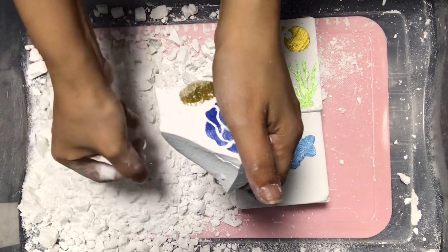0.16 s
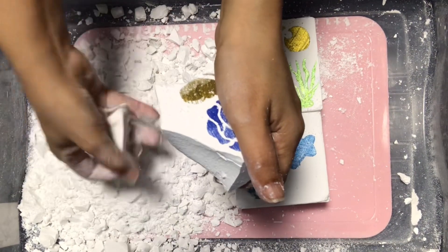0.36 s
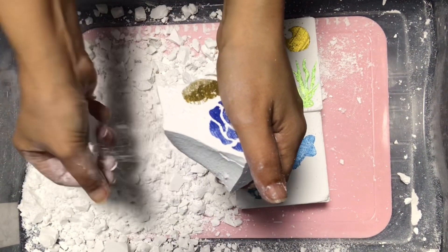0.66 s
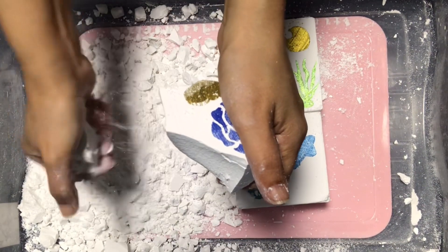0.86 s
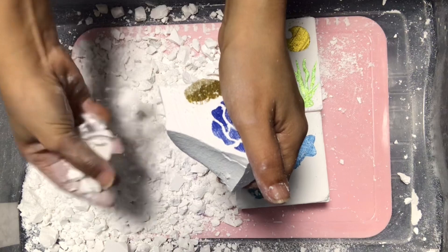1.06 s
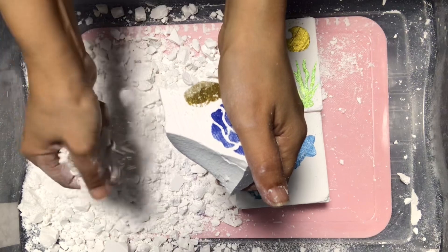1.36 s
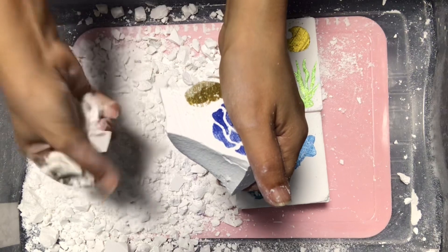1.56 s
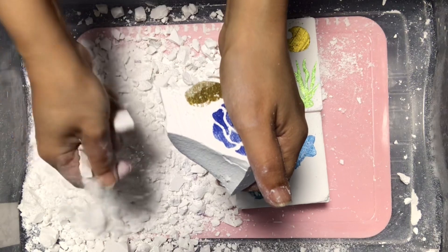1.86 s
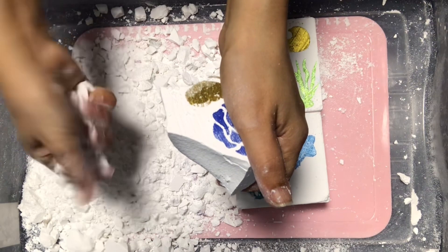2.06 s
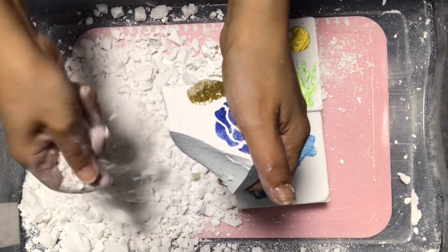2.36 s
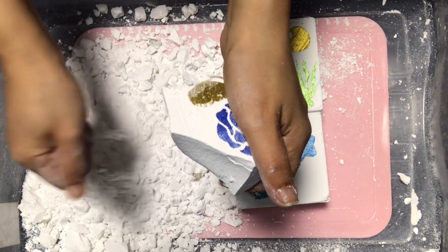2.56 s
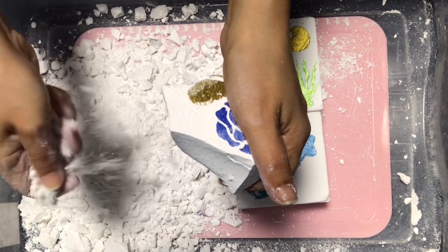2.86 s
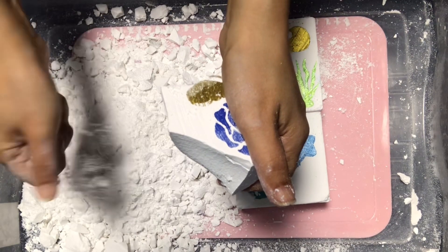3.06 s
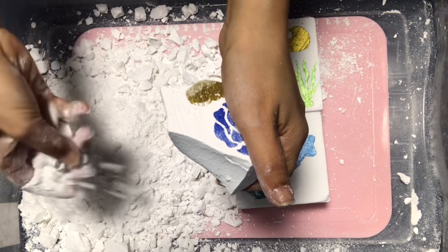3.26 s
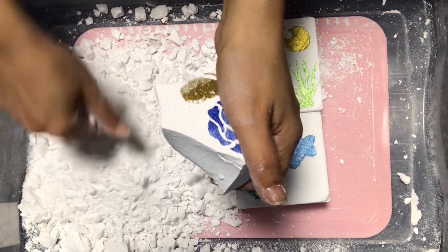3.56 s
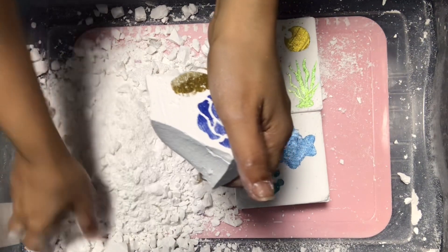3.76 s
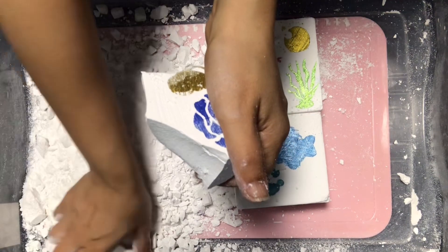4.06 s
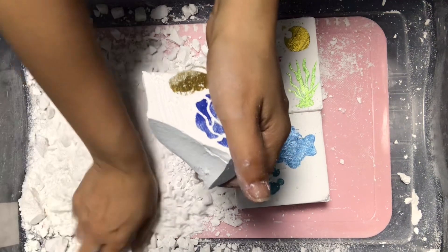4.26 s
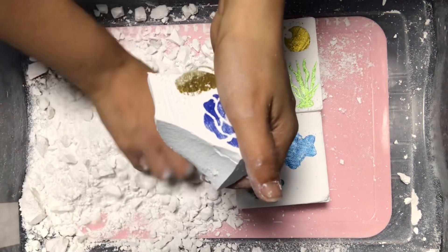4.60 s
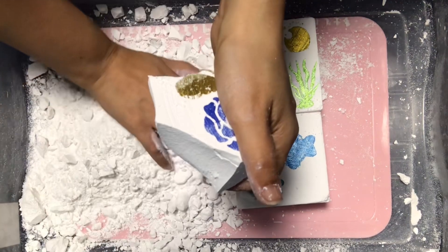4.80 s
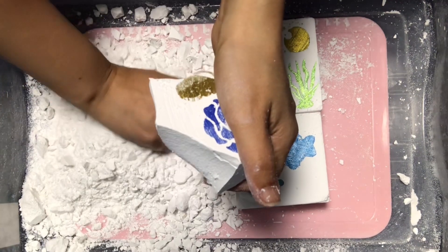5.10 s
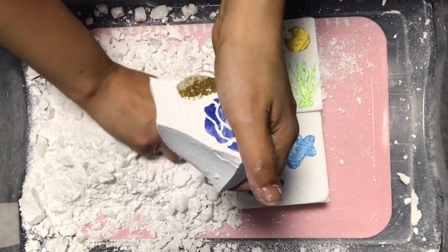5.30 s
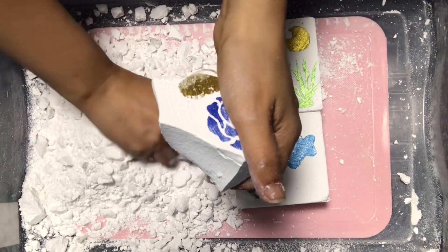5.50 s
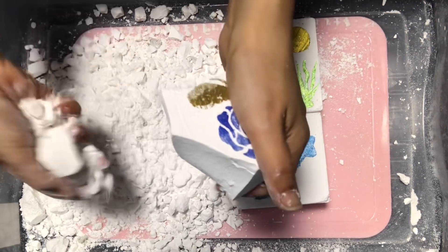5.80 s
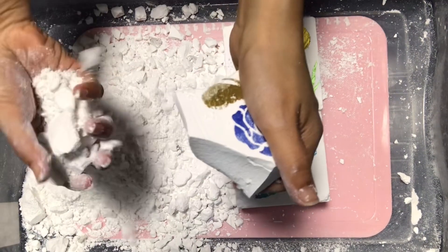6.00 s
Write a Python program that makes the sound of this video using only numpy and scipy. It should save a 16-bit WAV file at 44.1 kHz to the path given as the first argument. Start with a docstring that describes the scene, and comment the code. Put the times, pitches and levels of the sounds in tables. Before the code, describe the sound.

Brittle chalk lumps snap in bursts, the loudest slightly overloading a close microphone, while falling pieces tap the plastic tray. Later the hand drops into the crumbs: low table jolts, boomy tray thuds and coarse, muffled scraping. Finally it lifts out, nearly quiet, with a few light crunches. Dry small-room echoes and a faint steady room murmur lie beneath.

```python
"""At a table in a room, close to a plastic tray, a hand crushes dry chalk and then digs through the crumbs.
Lumps crack as noise bursts that ring fragments and shed grit; splinters keep one clear tone.
Falling pieces excite the tray modes, and the palm jolts the table at low pitch.
Powder hisses and crumbs scrape as random grains, swelling with each move of the hand.
Short echoes and the room's steady noise lie below; the loudest cracks overload the input."""
import sys
import numpy as np
from scipy import signal
from scipy.fft import rfft, irfft
from scipy.io import wavfile

SR = 44100
rng = np.random.default_rng(int(sys.argv[2]) if len(sys.argv) > 2 else 0)


def boost(x):
    """Linear amplitude factor 10**(x/20) for a level x in decibels (scalar or array-like)."""
    u = np.asarray(x, float) / 20
    return 10 ** u


def to_wav(s):
    """Save 16-bit WAV."""
    ch = np.atleast_2d(s).T  # columns
    pcm = np.round(np.clip(ch, -1, 1) * 32767)  # PCM
    wavfile.write(sys.argv[1], SR, pcm.astype(np.int16))


N = 270774   # length in samples

DIGGING_S = (3.75, 5.6)   # from, to: the hand is down in the heap


def rms_one(x):
    """Normalization: scale to unit power."""
    return x / np.sqrt(np.mean(x ** 2) + 1e-20)


def peak_one(x):
    """Normalization: scale to unit height."""
    return x / (np.max(np.abs(x)) + 1e-12)


def add(out, start_s, sound):
    """Superposition: lay a short sound into the track at its start."""
    i = round(start_s * SR)
    out[i:i + len(sound)] += sound[:N - i]


def fade(t60_s, size):
    """Exponential damping: a fall of 60 dB in t60_s."""
    return boost(-60 * np.arange(size) / (SR * max(t60_s, .001)))


def resonate(x, hz, width_hz):
    """Damped oscillator: a two-pole resonance with gain 1 on top."""
    r = np.exp(-np.pi * width_hz / SR)
    feedback = [1, -2 * r * np.cos(2 * np.pi * hz / SR), r * r]
    return signal.lfilter([(1 - r * r) / 2, 0, (r * r - 1) / 2], feedback, x)


def band(x, low_hz, high_hz):
    """Band limitation: a Butterworth band-pass."""
    edges = [low_hz, min(high_hz, .45 * SR)]
    return signal.sosfilt(signal.butter(2, edges, "band", fs=SR, output="sos"), x)


def body(x, modes):
    """Modal superposition: resonances in parallel, signs alternating."""
    return sum((-1) ** k * boost(db) * resonate(x, hz, width_hz)
               for k, (hz, width_hz, db) in enumerate(modes))


def colour(x, spectrum):
    """Spectral shaping: filter a steady sound to levels given on log frequency, at unit power."""
    hz, db = np.transpose(spectrum)
    grid = np.fft.rfftfreq(len(x), 1 / SR) + 1
    gain = boost(np.interp(np.log(grid), np.log(hz), db))
    return rms_one(irfft(rfft(x) * gain, len(x)))


def drift(rate_hz):
    """Low-passed noise: slow random motion of unit power."""
    r = np.exp(-2 * np.pi * rate_hz / SR)
    slow = signal.lfilter([1], [1, -2 * r, r * r], rng.standard_normal(N + SR))
    return rms_one(slow[SR:])


def grains(per_s, spread_db, clump_db, clump_rate_hz, smooth):
    """Random impulse process: uneven tiny contacts in clumps, over a smooth share of finest dust."""
    sizes = boost(spread_db * np.minimum(rng.exponential(1, N), 5)) * rng.standard_normal(N)
    clicks = sizes * (rng.random(N) < per_s / SR)
    dust = rng.standard_normal(N)
    return (rms_one(clicks) + smooth * dust) * boost(clump_db * drift(clump_rate_hz))


def crumbs(per_s, low_hz, high_hz, cycles):
    """Impulse excitation: crumbs split at random, each size ringing a few cycles at its own pitch."""
    clicks = grains(per_s, spread_db=4.5, clump_db=4.0, clump_rate_hz=25.0, smooth=0)
    dealt = rng.integers(0, 12, N)   # which of the 12 sizes splits
    pitches = np.geomspace(low_hz, high_hz, 12)
    return rms_one(sum(resonate(clicks * (dealt == k) + 1e-18, hz, hz / cycles)
                       for k, hz in enumerate(pitches)))


# steady noise of the room: pitch_hz, level_db (relative, per Hz)
ROOM = [(20, -40.5), (35, -13), (80, 4.5), (300, -4), (700, -4), (2000, -9.5), (5000, -14), (9000, -15),
        (13300, -22.5), (16000, -13.5)]


def room():
    """Stationary noise: a low murmur and hiss with a fixed spectrum."""
    return boost(-42.5) * colour(rng.standard_normal(N), ROOM)


def near_echoes(x):
    """Early reflection: tray rim, table and walls return a short dull wash."""
    size = round(.15 * SR)
    delayed = np.arange(size) > .002 * SR
    wash = rng.standard_normal(size) * fade(0.12, size) * delayed
    wash = band(wash, 160, 15000)
    return signal.fftconvolve(x, wash / np.sqrt(np.sum(wash ** 2)))[:N]


# squeezes above the tray and pushes through the heap:
# start_s, length_s, powder_gain_db, tray_load_gain_db
MOVES = [(0.0, 0.066, -37.5, -45.5), (0.168, .12, -60, -45.5), (0.331, 0.036, -41, -45.5),
         (0.381, 0.023, -33.5, -47), (0.457, 0.22, -47, -51.5), (.7, 0.16, -39.5, -48),
         (.93, 0.093, -39.5, -52), (1.068, 0.13, -38, -45.5), (1.212, .22, -37, -48),
         (1.515, 0.14, -43, -48.5), (1.691, 0.056, -40.5, -44.5), (1.817, .16, -38, -43),
         (2.033, 0.14, -43, -42), (2.198, 0.14, -40.5, -43), (2.352, 0.15, -38.5, -39.5),
         (2.63, 0.098, -41.5, -49), (2.845, 0.21, -42, -45.5), (3.126, 0.044, -46, -41),
         (3.262, 0.2, -42, -45.5), (3.469, 0.067, -37.5, -36), (3.62, 0.039, -40, -38.5),
         (3.765, 0.076, -40.5, -34), (3.88, 0.092, -37.5, -34), (3.988, 0.084, -37, -30),
         (4.086, 0.11, -40.5, -37.5), (4.19, 0.11, -36.5, -36.5), (4.3, 0.084, -44, -36),
         (4.417, 0.068, -50, -42.5), (4.532, 0.14, -46, -38.5), (4.728, 0.065, -44.5, -38),
         (4.873, 0.12, -42, -32.5), (4.994, 0.057, -41.5, -31.5), (5.078, 0.062, -40.5, -32),
         (5.157, 0.075, -43.5, -34), (5.283, 0.099, -44, -30), (5.429, 0.059, -42, -34),
         (5.5, 0.091, -59, -48.5), (5.903, .15, -49.5, -46)]
ATTACK_S, RELEASE_S = 0.027, .02   # linear rise, time constant of the fall
REST_DB = -51.5     # gain of powder and crumbs settling between moves
DUG_IN_DB = -46.5   # steady load of the hand resting in the heap


def moves():
    """Addition of powers: each move swells in, holds and dies away in the powder and load gains."""
    time = np.arange(N) / SR
    power = boost(2 * REST_DB) * np.ones((2, N))
    for start_s, length_s, powder_db, load_db in MOVES:
        rise = np.clip((time - start_s) / ATTACK_S + .5, 0, 1)
        fall = np.exp(-np.maximum(time - start_s - length_s, 0) / RELEASE_S)
        gains = boost(np.array([[powder_db], [load_db]]))
        power += (gains * rise * fall) ** 2
    resting = (time > DIGGING_S[0]) & (time < DIGGING_S[1] - .1)
    power[1] += boost(2 * DUG_IN_DB) * resting
    return np.sqrt(power)


RUMBLE_DB, USUAL_LOAD_DB = -48, -45   # table level under a usual load, and that load
RUMBLE_FOLLOWS = 0.43                 # share of the load's swing in dB


def rumble(load):
    """Forced vibration: the table gives low noise that follows the weight on it."""
    table = rms_one(band(rng.standard_normal(N), 57, 156))
    return table * boost(RUMBLE_DB) * (load / boost(USUAL_LOAD_DB)) ** RUMBLE_FOLLOWS


# falling powder: pitch_hz, level_db (relative, per Hz)
POWDER = [(880, -47), (1500, -3), (1670, -11), (3250, 1.5), (3520, 1.5), (6310, -1), (9470, -3.5),
          (16000, -8.5)]


def powder():
    """Granular noise: dust and grains hiss down, with bright crumbs ringing among them."""
    hiss = grains(1500., spread_db=1.5, clump_db=2.0, clump_rate_hz=25.0, smooth=1.16)
    return colour(hiss, POWDER) + 0.52 * crumbs(350., 3160, 8540, cycles=14)


# heap and tray under dragged crumbs: pitch_hz, width_hz, level_db
HEAP = [(800, 300, -6), (1200, 300, -3), (1900, 210, 0), (2200, 250, -6), (2750, 350, -9),
        (4700, 1500, -19)]


def scraping():
    """Friction noise: crumbs scrape along; only the pressed heap lends its resonances."""
    rubbing = grains(800., spread_db=2.0, clump_db=1.0, clump_rate_hz=52.0, smooth=0.73)
    time = np.arange(N) / SR
    buried = (time > DIGGING_S[0]) & (time < DIGGING_S[1])
    in_heap = rms_one(body(rubbing, HEAP))
    in_air = rms_one(band(rubbing, 740, 2470))
    drag = np.where(buried, in_heap, in_air) + 0.58 * crumbs(250., 736, 2300, cycles=11.4)
    return drag * np.where(buried, boost(-3.5), boost(-5.5))


# tray floor: pitch_hz, width_hz, level_db
TRAY = [(230.5, 48, 0.5), (329, 96, 0), (450, 109, 0.5), (583, 243, -10)]


def tray_shaking():
    """Random modal excitation: many small contacts keep the tray floor ringing."""
    contacts = grains(900., spread_db=4.0, clump_db=1.5, clump_rate_hz=14.0, smooth=1.72)
    return rms_one(body(contacts, TRAY))


def hand():
    """Amplitude modulation: the moves govern powder, scraping, tray and table."""
    shed, load = moves()
    return shed * powder() + load * (scraping() + tray_shaking()) + rumble(load)


# the palm comes down with its weight: start_s, peak_db
PALMS = [(3.776, -22), (3.93, -32), (4.012, -24), (4.9, -34), (5.302, -32), (0.771, -29)]
PALM_LOW_HZ, PALM_HIGH_HZ, PALM_T60_S = 48.3, 190, 0.42


def palms():
    """Low-frequency impact: the whole table gives a dull jolt and shudders on."""
    out, size = np.zeros(N), 16384
    noise = rng.standard_normal((len(PALMS), size))
    for (start_s, peak_db), shudder in zip(PALMS, noise):
        jolt = 1.8 * fade(0.012, size) + shudder * fade(PALM_T60_S, size)
        for _ in range(2):   # twice for steeper edges
            jolt = band(jolt, PALM_LOW_HZ, PALM_HIGH_HZ)
        add(out, start_s, boost(peak_db) * peak_one(jolt))
    return out


# pieces and fingers landing on the tray: start_s, peak_db, boom_hz
THUDS = [(0.063, -22.5, 516), (0.17, -13, 407), (0.196, -18.5, 418), (0.212, -18, 380), (0.534, -26, 454),
         (0.621, -22.5, 418), (0.773, -12.5, 490), (1.129, -23.5, 420), (1.88, -21, 410),
         (1.885, -14.5, 228), (2.022, -20, 450), (2.037, -18, 244), (2.071, -24, 247), (2.237, -22, 257),
         (2.415, -21.5, 275), (3.485, -24.5, 249), (3.781, -25, 440), (3.837, -18, 430),
         (3.852, -23.5, 258), (3.924, -12.5, 232), (4.014, -10, 224), (4.06, -9.5, 385), (4.179, -27, 335),
         (4.289, -11.5, 400), (4.649, -24, 202), (4.777, -26, 325), (4.898, -24, 316), (4.943, -17, 466),
         (5.034, -22, 455), (5.104, -27, 452), (5.21, -27, 193), (5.313, -14, 320), (5.342, -18.5, 361),
         (5.467, -21, 395)]
PANEL_DAMPING = 0.16   # ring width of a struck panel as a share of its pitch


def thuds():
    """Impact excitation: a soft push rings the panel under the piece, and all tray modes follow."""
    out, size = np.zeros(N), 4096
    noise = rng.standard_normal((len(THUDS), size))
    for (start_s, peak_db, boom_hz), shove in zip(THUDS, noise):
        push = np.exp(-np.arange(size) / (0.00019 * SR)) + 0.32 * shove * fade(0.019, size)
        panel = resonate(push, boom_hz, PANEL_DAMPING * boom_hz)
        sound = panel + 0.64 * body(push, TRAY) + 0.049 * band(push, 270, 1250)
        add(out, start_s, boost(peak_db) * peak_one(sound))
    return out


# hard splinters that ring on like glass, and one squeak in the heap at 3.81 s: start_s, level_db, pitch_hz,
# t60_s
PINGS = [(.081, -19, 10400, 0.024), (.171, -45, 10800, 0.095), (.228, -39, 8600, .12),
         (3.483, -43, 8350, 0.027), (3.6345, -14, 8780, 0.039), (3.8145, -7, 2260, 0.031)]


def pings():
    """Single-mode vibration: a hard splinter, or a squeak in the heap, keeps one clear, decaying tone."""
    out, size = np.zeros(N), 4096
    for start_s, level_db, hz, t60_s in PINGS:
        envelope = fade(t60_s, size) - fade(0.33 * t60_s, size)   # soft onset
        tone = np.sin(2 * np.pi * hz * np.arange(size) / SR)
        add(out, start_s, boost(level_db) * envelope * tone)
    return out


# recurring rings of the lumps in the cupped hand: pitch_hz, width_hz, level_db
LUMP = [(1100, 66, -25), (1590, 150, 7), (1970, 50, -40), (2290, 86, 5.5), (2590, 120, 0.5),
        (3400, 200, -2), (4160, 94, -22), (5450, 100, -21)]
# lumps breaking: start_s, ring_peak_db, ring_hz, sizzle_peak_db, knock_peak_db
CRACKS = [(0.0099, -8.5, 8360, -6, -19.5), (0.0554, -12, 4900, -6, -34), (0.0618, 0, 4900, -9, -8),
          (0.071, -13, 2880, -28, -19), (0.1138, -22, 4570, -22, -39), (0.1693, -12.5, 10300, -16.5, -13),
          (0.1947, -6, 1420, -30, -27), (0.2031, -8, 2180, -2, -10.5), (0.2084, -12, 1300, -18, -20),
          (0.242, -27, 8900, -28, -30.5), (0.2662, -26, 4890, -22, -36), (0.2947, -22, 2550, -18.5, -28),
          (0.3816, -20, 4010, -24, -24), (0.4513, -23, 8800, -16.5, -22), (0.466, -14, 4630, -19, -20.5),
          (0.5265, -19, 4070, -36, -18), (0.5359, -6, 3620, -9, -10.5), (0.5447, -6.5, 3630, -20, -20),
          (0.564, -13, 3570, -18, -22), (0.599, -10.5, 3360, -33, -26), (0.622, -3.5, 1590, -2, -6),
          (0.6343, -9, 5440, -30, -35), (0.7177, -7.5, 4460, -36, -36), (0.719, -23, 5850, -40, -32),
          (0.7435, -26, 4030, -29, -27), (0.77, -12, 2370, -23, -17), (0.7718, 10, 3930, 1.5, 6.5),
          (0.8146, -10, 4000, -11, -18), (0.825, -26, 5660, -20, -26), (1.055, -20, 2700, -35, -31),
          (1.0797, -16.5, 8200, -32, -20.5), (1.129, -2, 3530, -7.5, -6), (1.1604, -14, 5730, -22, -20),
          (1.1785, -16, 5700, -7, -27), (1.217, -14, 3960, -19, -39), (1.2403, -14, 7100, -15, -16),
          (1.247, -16, 8310, -28, -25), (1.2537, -7, 5560, -28, -23), (1.2653, 4, 3870, -19, -30),
          (1.2688, 6.5, 5830, 6, -8), (1.283, -9, 5660, -9, -35), (1.2881, -2, 3760, -25, -9),
          (1.3007, -4.5, 4470, -13, -15), (1.3129, -9.5, 5530, -11, -16), (1.3373, -4, 4930, -6, -17),
          (1.3833, -23, 5320, -27, -28), (1.4055, -2, 7100, -33, -23.5), (1.4154, -16, 5260, -25, -24),
          (1.424, -11, 5270, -13, -13.5), (1.44, -23, 1530, -25, -34), (1.742, -8, 5500, -13, -20.5),
          (1.7595, -16, 5640, -35, -33), (1.7686, -21, 8200, -15, -22), (1.8122, -10.5, 3850, -29, -41),
          (1.818, -21, 4830, -18, -33), (1.831, -16, 11430, -19, -17), (1.84, -12.5, 4130, -15, -27),
          (1.865, -17, 1980, -17, -34), (1.8745, -14, 4930, -16, -22), (1.8826, -15, 5730, -12, -17),
          (1.894, -30, 1200, -22, -17), (1.9075, -10.5, 4140, -29, -16), (1.916, -22, 2230, -18, -20.5),
          (1.973, -25, 5550, -34, -31), (2.0187, -15.5, 970, -40, -34), (2.0266, -14.5, 1260, -24, -36),
          (2.0371, -4.5, 1900, -1.5, -15), (2.069, -25, 1110, -38, -34), (2.2335, -9.5, 4700, -32, -18),
          (2.237, -16, 4100, -11, -36), (2.2774, -18, 3450, -27, -46), (2.3547, -16.5, 3240, -26, -28),
          (2.3765, -6.5, 3160, -42, -21), (2.4008, -30, 9450, -20.5, -39), (2.4157, -10, 3900, -33, -19),
          (2.421, -12.5, 3500, -31, -11.5), (2.4374, -10, 5550, -14, -18),
          (2.4805, -10.5, 5060, -10, -18.5), (2.4883, -15, 8350, -35, -21), (2.5, -10, 3500, -15, -37),
          (2.518, -6.5, 3930, -31, -26), (2.545, -34, 1240, -25, -22.5), (2.6123, -21, 2400, -20.5, -16),
          (2.6632, -17, 4100, -40, -30), (2.6682, -17, 3020, -31, -17.5), (2.6995, -19, 7200, -45, -33),
          (2.8312, -22.5, 5400, -35, -30), (2.8911, -15.5, 3260, -29, -43), (2.9506, -25, 1950, -25, -40),
          (2.9698, -28, 5270, -21, -35), (2.9983, -6, 3400, -14, -41), (3.033, -15, 3300, -25, -48),
          (3.0493, -10.5, 4400, -9, -20), (3.1404, -21, 1240, -27, -39), (3.2677, -20, 1920, -21, -20.5),
          (3.457, -18.5, 3280, -39, -22.5), (3.4847, -14, 8700, -15.5, -20),
          (3.5094, -14.5, 1800, -23, -15), (3.6228, -20, 7450, -16, -25), (3.6335, -18, 8400, -9.5, -15.5),
          (3.648, -19, 910, -40, -45), (3.7813, -16, 1850, -24, 2), (3.8184, -17, 2500, -30, -24),
          (3.8351, -11, 1520, -34, -9.5), (3.923, -18, 1080, -31, -34), (4.0118, -20, 1270, -19, -34),
          (4.0584, -11, 1370, -38, -30), (4.178, -26, 1180, -37, -19), (4.2882, -10.5, 1020, -39, -25),
          (4.943, -25, 2900, -22, -22.5), (4.9951, -22, 1940, -39, -26), (5.0176, -18, 2780, -37, -25),
          (5.034, -13.5, 2020, -34, -14), (5.104, -18, 1240, -32, -29), (5.1132, -27, 1930, -21, -17),
          (5.119, -20, 1900, -34, -35), (5.3043, -16, 1850, -37, -29), (5.342, -21, 1070, -42, -38),
          (5.3797, -16, 1890, -25, -36), (5.3997, -21.5, 1940, -40, -35), (5.46, -19, 1920, -14, -30),
          (5.909, -39, 7900, -15.5, -18.5), (5.9262, -11.5, 3300, -15.5, -21.5),
          (5.9821, -32, 4160, -26, -23.5), (6.016, -25, 7500, -23.5, -41), (6.124, -23, 5600, -44, -25)]
# decay of a crack of usual strength; harder cracks last longer
CRACK_T60_S, USUAL_CRACK_DB, T60_DB_PER_DB = 0.016, -18, 0.0147
# band of a crack's dull knock: low_hz, high_hz
KNOCK_IN_HAND, KNOCK_IN_HEAP = (785, 3260), (690, 2370)


def cracks():
    """Brittle fracture: a sharp tick and a burst of a few ms ring the fragment, then grit trickles."""
    out, in_hand, in_heap, size = np.zeros(N), np.zeros(N), np.zeros(N), 4096
    rise = 1 - np.exp(-np.arange(size) / (.00008 * SR))   # the fracture takes a moment to run through
    noise = rng.standard_normal((len(CRACKS), 3, size))
    for (start_s, ring_db, hz, sizzle_db, knock_db), (tear, spray, grit) in zip(CRACKS, noise):
        strength_db = max(ring_db, sizzle_db, knock_db) - USUAL_CRACK_DB
        t60_s = CRACK_T60_S * boost(T60_DB_PER_DB * strength_db)
        shape = rise * (fade(t60_s, size) + 2.4 * fade(0.13 * t60_s, size))

        burst = tear * shape
        ring = resonate(burst, hz, 0.16 * hz) + 0.14 * band(burst, .5 * hz, 1.93 * hz)
        sizzle = band(spray * shape, 3400, 11400)
        knock = spray * rise * fade(0.54 * t60_s, size)
        buried = DIGGING_S[0] < start_s < DIGGING_S[1]
        edges = KNOCK_IN_HEAP if buried else KNOCK_IN_HAND
        dull = band(band(knock, *edges), *edges)
        sound = boost(ring_db) * peak_one(ring)
        sound += boost(sizzle_db) * peak_one(sizzle)
        sound += boost(knock_db) * peak_one(dull)

        trickle = grit * spray ** 2 * fade(0.13, size)   # uneven grains, dying away
        sound += boost(ring_db - 25.0) * resonate(trickle, hz, 0.57 * hz)
        add(out, start_s, sound)
        surroundings = in_heap if buried else in_hand
        add(surroundings, start_s, boost(knock_db) * (boost(-17.5) * trickle + 0.75 * knock))
    return out + body(in_hand, LUMP) + boost(8.5) * body(in_heap, HEAP)


def scene():
    """Superposition: chalk and tray with their echoes over the noise of the room."""
    chalk = cracks() + thuds() + palms() + pings() + hand()
    return (chalk + boost(-16.5) * near_echoes(chalk) + room())[None]


def roll_off(x):
    """The treble ends steeply here."""
    return signal.sosfilt(signal.butter(12, 16360, fs=SR, output="sos"), x)


def record(dry):
    """Clipping and low-pass filtering: the input overloads at full scale and the top is cut."""
    overloaded = np.clip(dry, -1, 1)
    low_pass = signal.cheby2(14, 60, 16500, fs=SR, output="sos")   # 60 dB down from 16500 Hz
    mix = np.clip(signal.sosfilt(low_pass, overloaded), -1, 1)
    return roll_off(mix)


dry = scene()
out = record(dry)
to_wav(out)
```